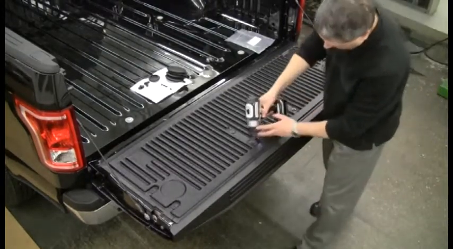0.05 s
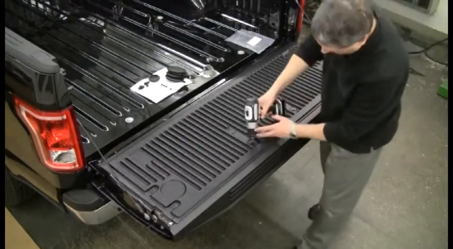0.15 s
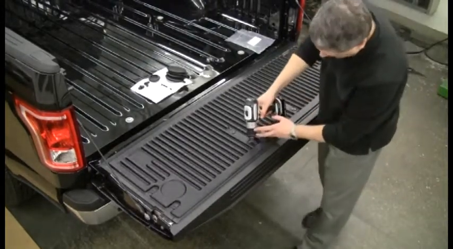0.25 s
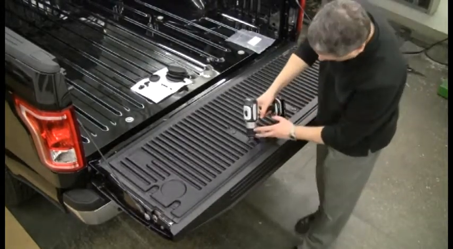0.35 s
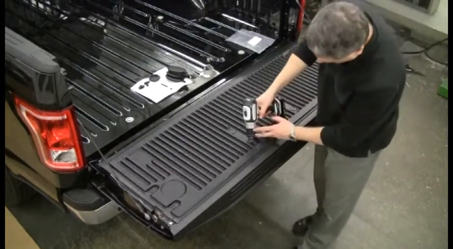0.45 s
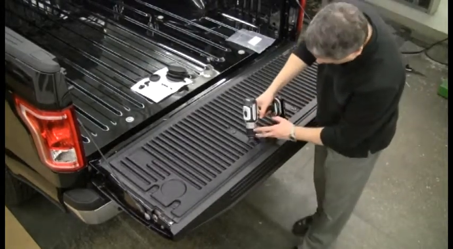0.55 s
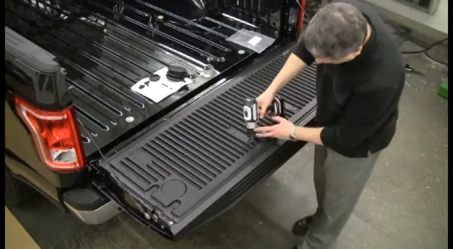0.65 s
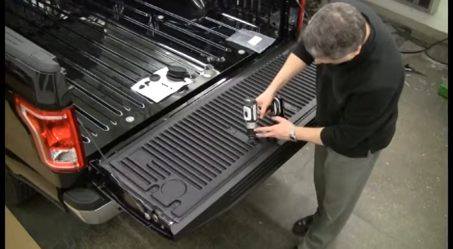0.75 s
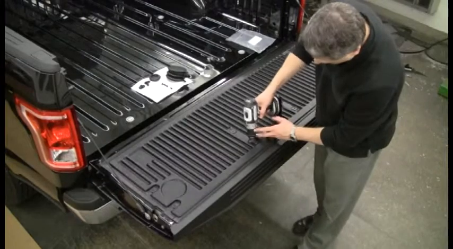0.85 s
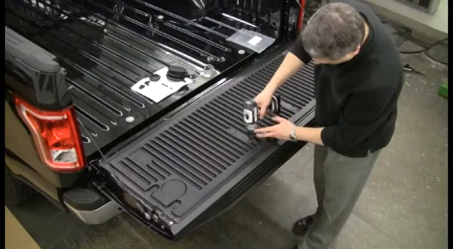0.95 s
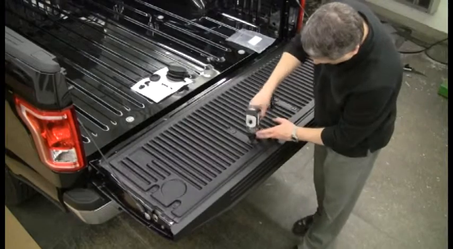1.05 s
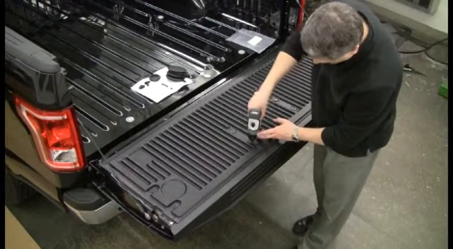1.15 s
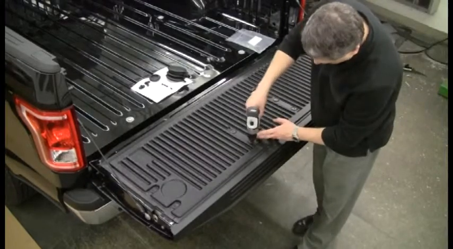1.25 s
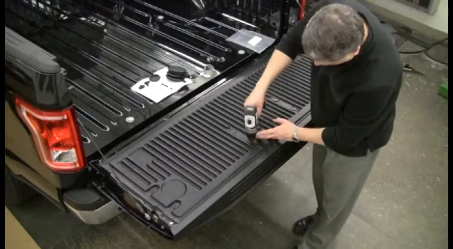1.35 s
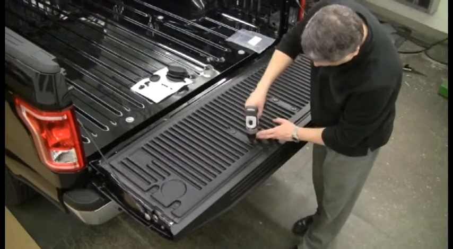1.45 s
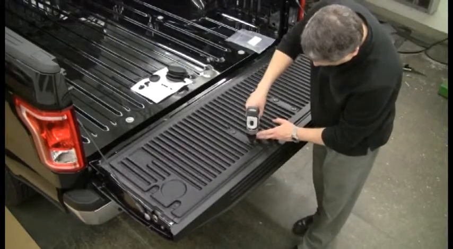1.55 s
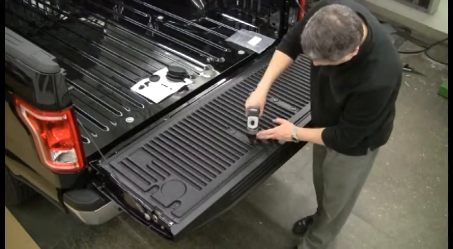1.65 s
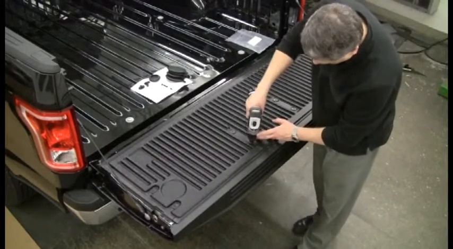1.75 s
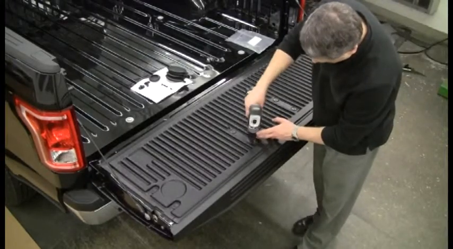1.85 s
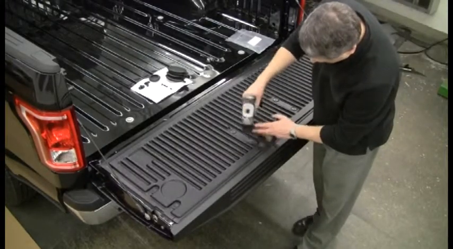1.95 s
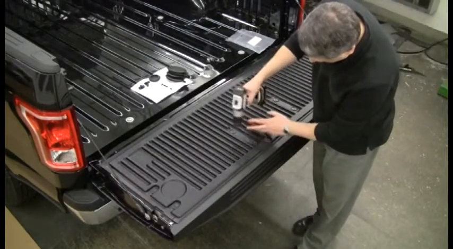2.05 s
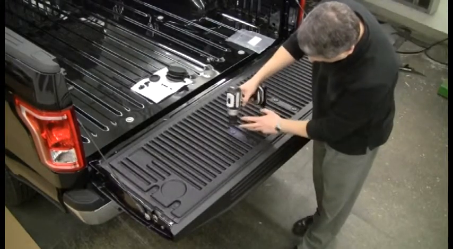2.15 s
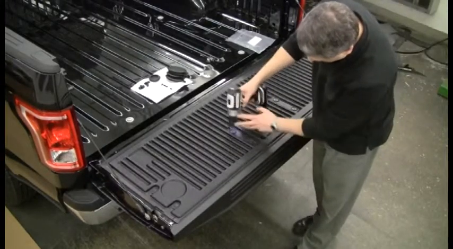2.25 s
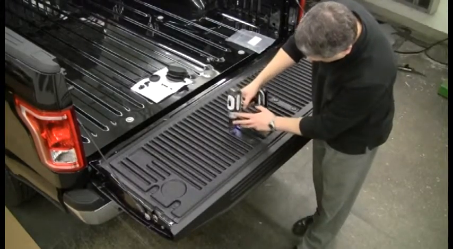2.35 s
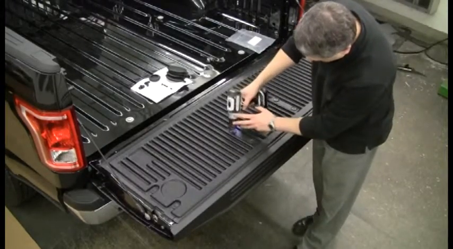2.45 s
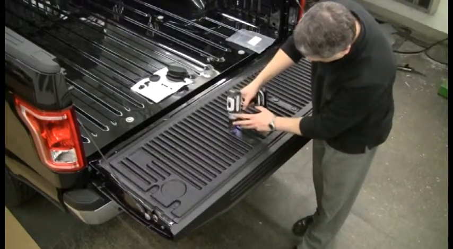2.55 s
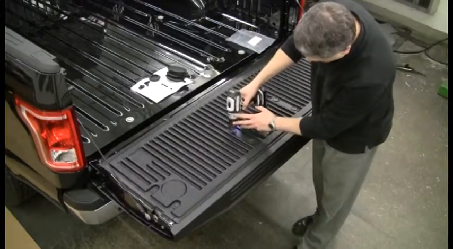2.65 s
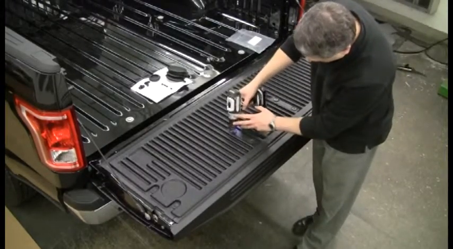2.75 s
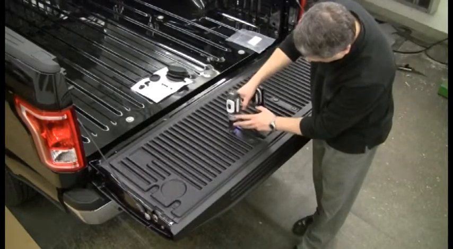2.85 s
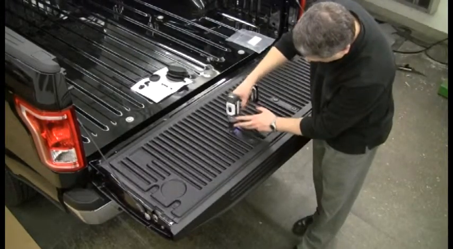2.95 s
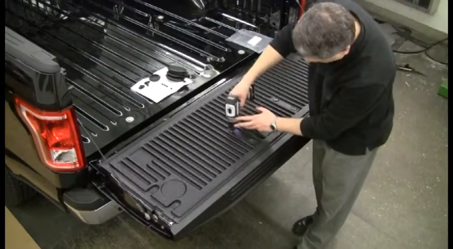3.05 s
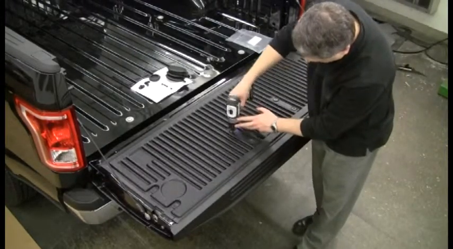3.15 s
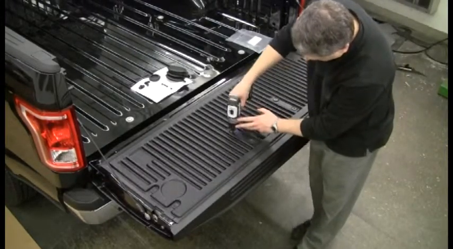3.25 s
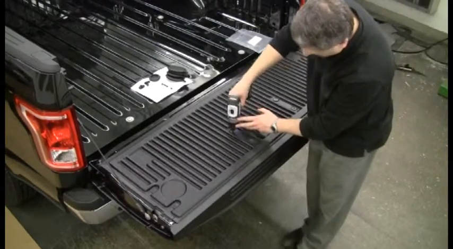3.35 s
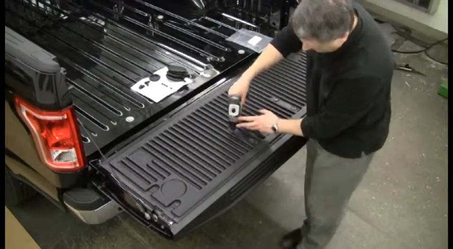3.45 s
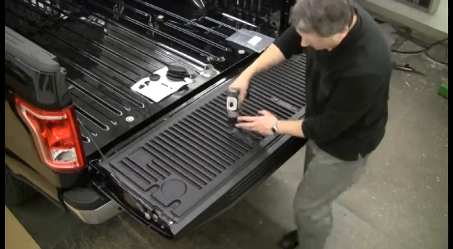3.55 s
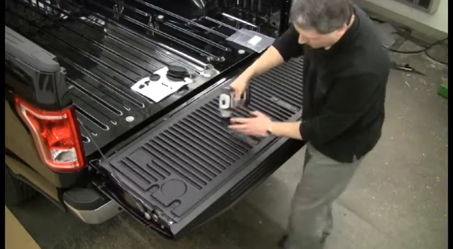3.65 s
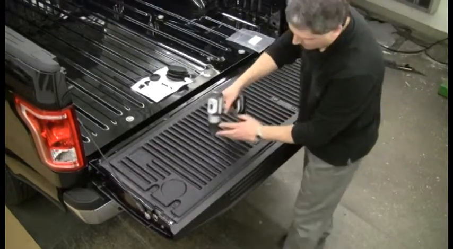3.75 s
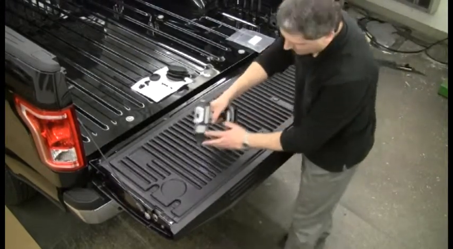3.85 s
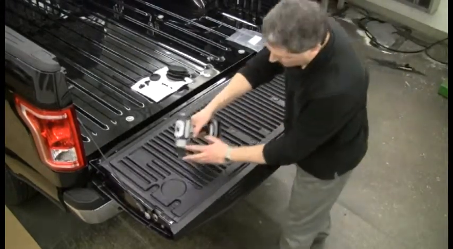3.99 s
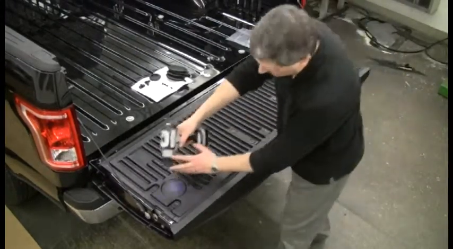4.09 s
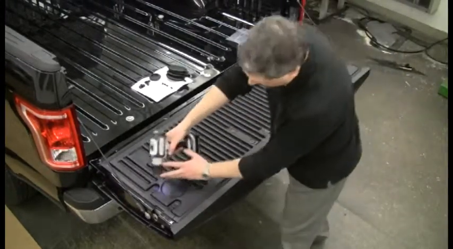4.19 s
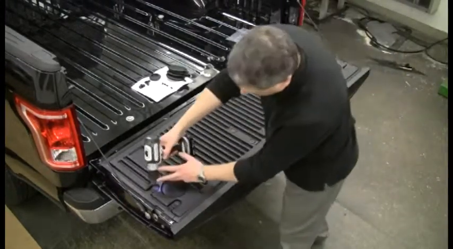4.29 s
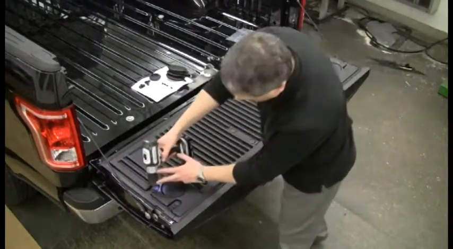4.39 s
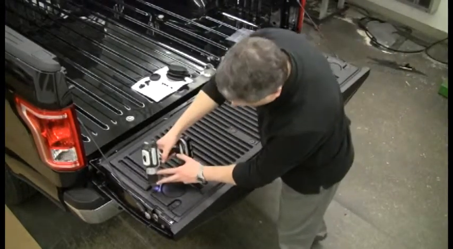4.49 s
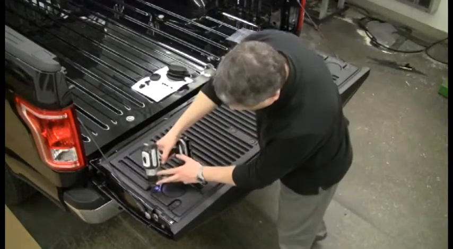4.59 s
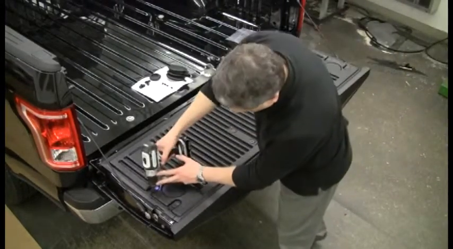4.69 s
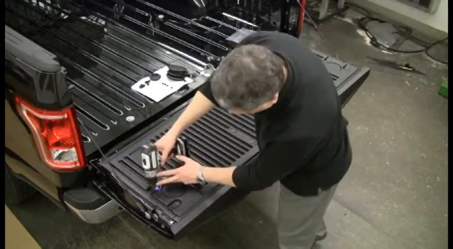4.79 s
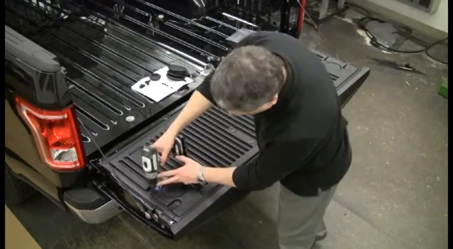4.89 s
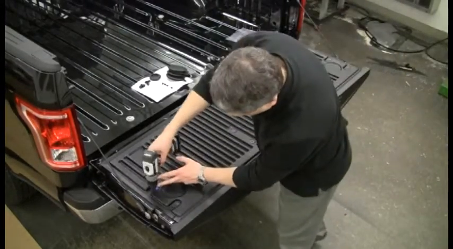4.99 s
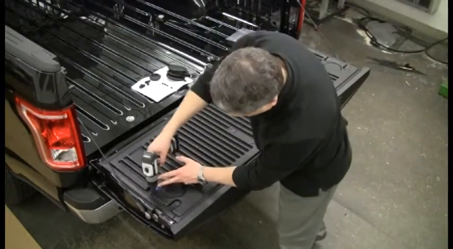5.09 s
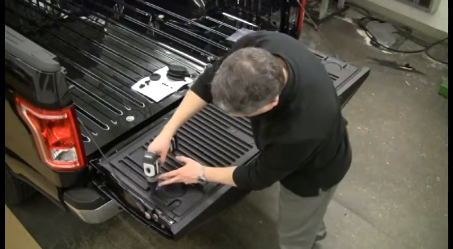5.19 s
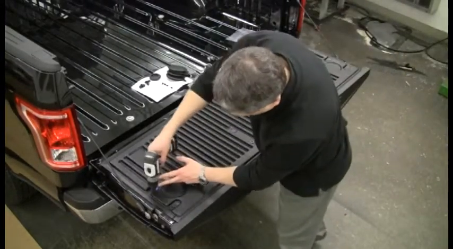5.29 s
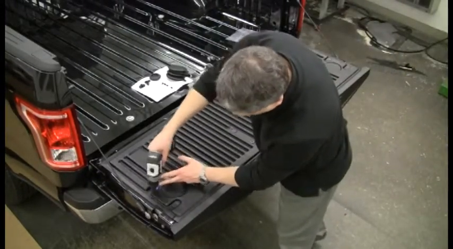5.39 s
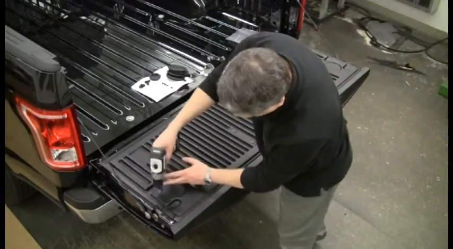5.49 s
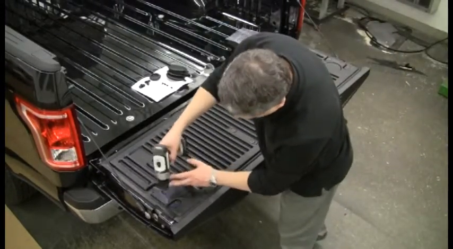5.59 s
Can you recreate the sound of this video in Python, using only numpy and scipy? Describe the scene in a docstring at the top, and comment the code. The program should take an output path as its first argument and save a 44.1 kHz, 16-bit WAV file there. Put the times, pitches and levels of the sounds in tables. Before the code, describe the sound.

Loose plastic panel knocks and a faint shoe scuff come first, then a loud hollow clack. A cordless driver zips briefly, chatters on its clutch and stalls; after more knocks it does so again, and once more near the end. Low rumble continues throughout. Moderately close microphone in a concrete garage, with bright, lively reverberation.

```python
"""Cordless driver and plastic panel

A cordless driver sets three screws into a ribbed plastic panel in a concrete workshop, over a low rumble.
Each burst: a trigger click, gears whining up to speed, then the clutch ratcheting and a rough stop.
Whir, scuffs, knocks and clicks are shaped noise; whine and ratchet are stacks of sine tones plus noise.
The panel knocks under the bit and jolts as the motor starts; a shoe scuffs the floor; the room adds an echo."""
import sys
import numpy as np
from scipy import signal
from scipy.fft import rfft, irfft
from scipy.io import wavfile
from scipy.ndimage import uniform_filter1d, map_coordinates

SR = 44100
rng = np.random.default_rng(int(sys.argv[2]) if len(sys.argv) > 2 else 0)


def transcribe(u):
    """Save the signal u as a 16-bit wav file named by the first command-line argument.

    u: samples, shape (n,) or (channels, n), limited to [-1, 1]; the rate is SR.
    q: integer samples, one column per channel.
    """
    v = np.clip(np.atleast_2d(u).T, -1, 1)
    q = np.round(v * 32767).astype(np.int16)
    wavfile.write(sys.argv[1], SR, q)


def gain_from_decibels(decibels):
    """Convert decibel values to linear amplitude factors."""
    exponent = np.asarray(decibels, float) / 20
    return 10 ** exponent


N = 248282  # length in samples


def evened(x):
    """Scales a sound to an average (rms) strength of 1."""
    return x / np.sqrt(np.mean(x ** 2) + 1e-20)


def read(points, hz):
    """Reads a curve between its points, on a log-frequency axis as the ear hears pitch."""
    f, value = np.transpose(points)
    return np.interp(np.log(hz + 1), np.log(f + 1), value)


def colour(x, points):
    """Makes each pitch region louder or softer, following a curve in dB."""
    size = x.shape[-1]
    gain = gain_from_decibels(read(points, np.fft.rfftfreq(size, 1 / SR)))
    return irfft(rfft(x) * gain, size)


def ring(x, peaks, between_db):
    """Lets x set off resonances, with a flat share of x between them, then evens the result."""
    hz = np.fft.rfftfreq(len(x), 1 / SR)
    modes = sum(gain_from_decibels(db) / (1 + 2j * (hz - f) / width) for f, width, db in peaks)
    return evened(irfft(rfft(x) * (gain_from_decibels(between_db) + modes), len(x)))


def add(mix, s, sound):
    """Mixes a sound in at time s, as sounds in air simply add up."""
    part = mix[round(s * SR):][:len(sound)]
    part += sound[:len(part)]


def unroll(rows):
    """Joins timed rows by straight lines: start time, and every other column at sample rate."""
    s, *columns = np.transpose(rows)
    t = np.arange(s[0], s[-1], 1 / SR)
    return s[0], [np.interp(t, s, c) for c in columns]


def hiss(rows, spectrum, peaks, between_db, grain_db):
    """Rubbing and rushing: grainy coloured noise through resonances, on a level curve."""
    s, (level_db,) = unroll(rows)
    white, grain = rng.standard_normal((2, len(level_db)))
    grain = evened(uniform_filter1d(grain, size=40))
    sound = ring(colour(white * gain_from_decibels(grain_db * grain), spectrum), peaks, between_db)
    return s, sound * gain_from_decibels(level_db) * signal.windows.tukey(len(sound), .06)


# Colour of the background air: f/Hz, level/dB (only the shape counts)
AIR_COLOUR = [(15, -58), (25, -17.5), (114, -0.5), (770, -13.5), (1080, -18), (1730, -23), (2030, -19),
              (2630, -25.5), (4000, -32.5), (9010, -41), (10500, -40.5), (11700, -42.5), (13000, -58)]
# Gain of its side signal: f/Hz, level/dB
AIR_SIDE = [(60, -30), (380, -2), (2380, -3.5), (15000, 0.5)]


def air():
    """Ventilation rumble and distant hum of the shop as noise, slowly swelling: mid and side."""
    swell = evened(uniform_filter1d(rng.standard_normal(N), size=6000))
    noise = evened(colour(rng.standard_normal((2, N)), AIR_COLOUR))
    mid, side = gain_from_decibels(-65 + 1.14 * swell) * noise
    return mid, colour(side, AIR_SIDE)


# Resonances of the plastic panel: f/Hz, width/Hz, level/dB
PANEL_MODES = [(196, 83, 5), (278, 15.3, 4.5), (459, 28, -8), (556, 41, -1.5), (740, 170, -5.5),
               (975, 83, -2), (1470, 440, -2.5)]
# Colour of the blow that sets them off: f/Hz, level/dB (only the shape counts)
BLOW_COLOUR = [(120, -35), (250, -3.5), (700, -5.5), (1500, -10), (3000, -10), (8000, -43)]
# Colour of the sharp crack: f/Hz, level/dB (only the shape counts)
CRACK_SHAPE = [(1000, -20), (2500, 5), (4000, 9.5), (6500, -13), (11000, -7.5), (15000, -55)]


def knock(level_db, crack_db, centre_hz, ring_t60):
    """The loose panel chatters in its modes, strongest near the centre pitch of the blow; plus crack and thud."""
    t = np.arange(SR // 2) / SR
    white = rng.standard_normal((3, len(t)))
    body = ring(colour(white[0], BLOW_COLOUR), PANEL_MODES, between_db=-10)
    body = gain_from_decibels(-6) * colour(body, [(centre_hz / 3, -5), (centre_hz, 0), (centre_hz * 3, -12)])
    body *= gain_from_decibels(-60 * t / ring_t60) * np.minimum(t / 0.00029, 1)
    crack_t60, thud_t60 = .018, .5  # seconds to fade by 60 dB
    crack = evened(colour(white[1], CRACK_SHAPE)) * gain_from_decibels(crack_db - 60 * t / crack_t60)
    low_noise = evened(colour(white[2], [(45, -2), (90, 10.5), (180, 20.5), (350, -26)]))
    thud = low_noise * gain_from_decibels(-22 - 60 * t / thud_t60)
    thud *= 1 - np.exp(-t / 0.0084)  # soft start
    return gain_from_decibels(level_db) * (body + thud + crack)


# Knocks on the panel: blows of the bit, and the jolts as the motor starts at 3.206 and 5.181 s:
# t/s, level/dB, crack level/dB above that, centre of the ring f/Hz, ring t60/s
PANEL_KNOCKS = [(0.263, -37, -20.5, 580, 0.33), (0.482, -37.5, -34, 567, 0.21),
                (0.72, -33.5, -22, 583, 0.25), (0.854, -33, -31, 540, 0.26), (1.091, -51.5, -41, 296, 0.42),
                (1.309, -21, -14, 515, 0.27), (2.285, -45, -45, 400, 0.32), (2.55, -31, -21.5, 473, 0.4),
                (2.661, -47.5, -35, 560, 0.14), (2.969, -39, -26, 601, 0.19), (3.206, -31.5, -7, 606, 0.36),
                (4.655, -30, -12.5, 710, 0.39), (4.69, -36, -34, 447, 0.26),
                (4.819, -36.5, -31.5, 404, 0.21), (5.181, -34, -2.5, 570, 0.73)]


def panel_knocks(mix):
    """Blows of the bit and motor-start jolts knock the panel, each with its own strength and pitch."""
    for s, *blow in PANEL_KNOCKS:
        add(mix, s, knock(*blow))


# Echo of the workshop: f/Hz, t60/s
ECHO_T60 = [(100, 0.39), (300, 0.8), (800, 0.7), (2000, 1.1), (5000, 1.17), (9000, 0.62), (13000, 0.4)]


def shop(x):
    """Two tails of sparse random taps, each band dying at its own speed; a random wandering delay blurs steady tones."""
    taps = np.zeros((2, 60000))
    # one tap of random sign somewhere in every 20 samples
    at = np.arange(300, 59980, 20) + rng.integers(0, 20, (2, 2984))
    np.put_along_axis(taps, at, rng.choice([-1., 1.], at.shape), 1)
    hz, t, z = signal.stft(taps, SR, nperseg=256)
    fade = gain_from_decibels(-60 * t / read(ECHO_T60, hz)[:, None])
    tail = signal.istft(z * fade, SR, nperseg=256)[1]
    wander = uniform_filter1d(uniform_filter1d(rng.standard_normal(N), size=450), size=450)
    # typically 12 samples early or late
    blurred = map_coordinates(x, [np.arange(N) + 12 * evened(wander)], order=3)
    return signal.fftconvolve(blurred[None], tail / np.linalg.norm(tail[0]), axes=1)[:, :N]


# Shoe scuffs: start t/s, rise t/s, fall t/s, loudest level/dB
SHOE_SCUFFS = [(.385, 0.074, .12, -53), (3.869, .016, 0.067, -53)]
# Colour of the rubbing: f/Hz, level/dB (only the shape counts)
RUB_COLOUR = [(1000, -14), (2000, -11.5), (4500, -12.5), (12000, -21), (15000, -39)]
# Resonances of the sole: f/Hz, width/Hz, level/dB
SOLE_MODES = [(2510, 330, -7), (3540, 440, -7)]


def scuffs(mix):
    """A sole rubs the floor: noise that swells and falls."""
    for s, rise, fall, db in SHOE_SCUFFS:
        edge_db = db - 13.5
        rows = [(s, edge_db), (s + rise, db), (s + rise + fall, edge_db)]
        add(mix, *hiss(rows, RUB_COLOUR, SOLE_MODES, between_db=-8.5, grain_db=0))


def click(peak_db, hz, t60):
    """A short snap of noise, a broad band reaching up to about the given pitch."""
    t = np.arange(3000) / SR
    burst = rng.standard_normal(len(t)) * gain_from_decibels(-60 * t / t60)
    burst[0] = 4  # the first contact is a strong kick
    band = signal.butter(2, [hz / 4.74, hz * 1.1], "bandpass", fs=SR, output="sos")
    snap = signal.sosfilt(band, burst)
    return gain_from_decibels(peak_db) * snap / abs(snap).max()


# Sharp clicks of the bit: t/s, peak level/dB, upper edge f/Hz, t60/s
BIT_CLICKS = [(0.559, -47, 844, .04), (0.852, -48, 3000, 0.019), (1.303, -39.5, 800, 0.048),
              (1.31, -32, 2330, 0.032), (4.05, -39.5, 1220, 0.031), (4.272, -48, 6460, 0.015),
              (4.294, -42.5, 1390, 0.038), (4.657, -31.5, 3230, 0.013)]


def bit_clicks(mix):
    """The bit makes sharp clicks, each a short snap of noise."""
    for s, *snap in BIT_CLICKS:
        add(mix, s, click(*snap))


# Colour of the motor's whir: f/Hz, level/dB (only the shape counts)
MOTOR_COLOUR = [(150, -57), (400, -11), (1500, -10.5), (2500, -11.5), (4000, -9.5), (6200, -7), (11000, -6),
                (13000, -11.5), (15500, -11)]
# Resonances of the tool's shell: f/Hz, width/Hz, level/dB
SHELL_MODES = [(3490, 1600, 4), (4770, 1900, -10), (7940, 1800, -6), (10250, 1100, -8), (11400, 600, -7.5)]


def whir(trigger, lets_go, stalls, db):
    """Motor noise swells with speed, drops when the clutch takes the load, swells again and ends after the stall."""
    rows = [(trigger, db - 18), (trigger + 0.026, db - 6), (trigger + 0.058, db - 3),
            (lets_go, db), (lets_go + 0.035, db - 9),
            (stalls, db - 4.5), (stalls + .04, db - 5)]  # t/s, level/dB
    return hiss(rows, MOTOR_COLOUR, SHELL_MODES, between_db=-7, grain_db=1.6)


def run_up(trigger, lets_go, db, spin_s):
    """The shaft leaps to a share of top speed, then eases up; the whine grows with time and speed: t/s, f/Hz, level/dB."""
    lag_s, top_hz, start_share = .012, 286.9, .45
    t = np.linspace(0, lets_go - trigger - lag_s, num=32)
    hz = top_hz * (1 - (1 - start_share) * np.exp(-(t / spin_s) ** 2))
    early_db = -4.5 * (1 - t / t[-1])  # quieter at first
    slow_db = -30 * (1 - hz / top_hz)  # and quieter at low speed
    return np.transpose([trigger + lag_s + t, hz, db + early_db + slow_db])


# Whine tones as multiples of shaft speed: unbalance, commutator and gear mesh
SHAFT_MULTIPLES = [1, 2, 9, 9.7, 16.87, 18.6, 20, 25.3]


def whine(rows, orders_db):
    """Shaft multiples rising with the motor, each wavering a little, and a hiss beating once a turn."""
    s, (shaft_hz, level_db) = unroll(rows)
    turns = np.cumsum(shaft_hz) / SR
    waver = uniform_filter1d(rng.standard_normal((len(orders_db), len(turns))), size=500)
    # pitch and strength both flutter as the gears take load
    tones = sum(gain_from_decibels(db + 60 * w[::-1]) * np.sin(2 * np.pi * k * turns + 9.3 * w)
                for k, db, w in zip(SHAFT_MULTIPLES, orders_db, waver))
    beat = np.exp(-(turns % 1) / 0.42)
    brushes = colour(rng.standard_normal(len(turns)) * beat, MOTOR_COLOUR)
    brushes = ring(brushes, SHELL_MODES, between_db=-4)
    sound = np.sqrt(2) * tones + gain_from_decibels(-9) * brushes
    return s, sound * gain_from_decibels(level_db) * signal.windows.tukey(len(turns), .1)


def slipping(lets_go, stalls, db, rate_hz, first_db, stop_db, stop_s, fade_db):
    """The ratchet settles, runs steady, then slows and roughens at the stall: t/s, level/dB, f/Hz, roughness 0-1."""
    steady_rough, stop_rough = 0.013, 0.84
    sag_hz, stop_hz = rate_hz * .92, rate_hz * .8
    stop, end_db = stalls + stop_s, db + stop_db
    return [(lets_go, db + first_db, rate_hz * 0.98, 0.2),
            (lets_go + .035, db, rate_hz, steady_rough),
            (stalls - .01, db - 0.7, rate_hz, steady_rough),
            (stalls + 0.02526, db + stop_db / 2, sag_hz, stop_rough),
            (stop, end_db, stop_hz, stop_rough),
            (stop + .055, end_db + fade_db, stop_hz, stop_rough)]


# Colour of the rough rattle: f/Hz, level/dB (only the shape counts)
RATTLE_COLOUR = [(88, -42), (150, -15), (352, -1.5), (748, 3.5), (1750, -6), (2540, -8.5), (4000, -12.5),
                 (5200, -27), (8800, -120)]


def clutch(rows, orders_db):
    """Each slip kicks the panel: clean multiples while steady, rattle as it stalls, a hiss tick per slip."""
    s, (level_db, rate_hz, rough) = unroll(rows)
    slips = np.cumsum(rate_hz) / SR
    # each multiple drifts in strength as the screw seats; each has its own fixed phase
    drift = evened(uniform_filter1d(rng.standard_normal((len(orders_db), len(slips))), size=2000))
    steady = sum(gain_from_decibels(db + 2.76 * d) * np.cos(2 * np.pi * k * slips - 0.0414 * k ** 2)
                 for k, (db, d) in enumerate(zip(orders_db, drift), start=1))
    fade = np.exp(-(slips % 1) / 0.46)
    size = gain_from_decibels(1.03 * rng.standard_normal(64))[slips.astype(int)]  # no two slips alike
    white = rng.standard_normal((2, len(slips)))
    rattle = evened(colour(white[0] * (1 + fade) * size, RATTLE_COLOUR))
    ticks = colour(white[1] * fade ** 3 * size ** 2, MOTOR_COLOUR)
    ticks = ring(ticks, SHELL_MODES, between_db=3)
    clean = evened(steady) + gain_from_decibels(-8.5) * ticks
    sound = np.sqrt(1 - rough) * clean + np.sqrt(rough) * rattle
    return s, sound * gain_from_decibels(level_db) * signal.windows.tukey(len(slips), .03)


# One row a screw: trigger t/s, clutch lets go t/s, bit stalls t/s, whir level/dB, whine level/dB, spin-up t/s
SCREWS = [(1.564, 1.724, 1.845, -36.5, -47.5, .042), (3.192, 3.286, 3.41, -37.5, -49.5, 0.028),
          (5.161, 5.3, 5.408, -37.5, -45, .04)]
# One row a screw, level/dB of each whine tone
WHINE_LEVELS = [(-2, -6, -4, 1.5, -4, -11, 2, -1.5), (-16, -11.5, 4, -16.5, 1.5, 2.5, -5, -1),
                (-16, -8, 1.8, -10, -12, -5, -9, -4.5)]
# One row a screw: clutch level/dB, ratchet rate f/Hz, first slips level/dB above that,
# rough stop level/dB above that, stop length t/s, final fade level/dB
RATCHETS = [(-34, 134.6, 0.6, 2, .04, -26), (-35, 136, 2.2, 2.5, .04, -9.5),
            (-32.5, 130, -6, -3.5, .06, -9)]
# One row a screw, how the panel answers: level/dB of multiples 1 to 16 of the ratchet rate
PANEL_ANSWERS = [ (-15.5, 6.5, 5, -1, -22, -1, -3.5, 1, -57, -1.5, -7.5, 7, -4, -4, -7.5, -13),
                 (-18.5, 4.5, -1.5, -6.5, -26, 2.5, -3.5, -5, -1, 5.5, -23, 1, -10, -6, -6, -25),
                 (-51, -4, 2.5, -1, -17, 0.5, -8.5, -7.5, -35, -19, -10.5, -8, -23, -11, -28, -14), ]


def drive_screws(mix):
    """Each burst: the trigger clicks, the motor spins up, the clutch lets go and slips until the bit stalls."""
    for burst, whine_levels, ratchet, answer in zip(SCREWS, WHINE_LEVELS, RATCHETS, PANEL_ANSWERS):
        trigger, lets_go, stalls, whir_db, whine_db, spin_s = burst
        add(mix, trigger, click(peak_db=-41, hz=5000, t60=0.046))
        add(mix, *whir(trigger, lets_go, stalls, whir_db))
        add(mix, *whine(run_up(trigger, lets_go, whine_db, spin_s), whine_levels))
        # the clutch click follows about half of the first slips' extra level
        click_db = ratchet[0] + 0.51 * ratchet[2] + 13.1
        add(mix, lets_go, click(click_db, hz=2450, t60=0.0085))
        add(mix, *clutch(slipping(lets_go, stalls, *ratchet), answer))


# Gain of the diffuse side signal: f/Hz, level/dB
SIDE_GAIN = [(60, -14), (150, -36.5), (380, -23), (950, -15), (2380, -15), (5980, -9), (15000, -2)]


def scene():
    """All sources near the middle; the side signal is the diffuse part, its gain highest in the treble."""
    near = np.zeros(N)
    panel_knocks(near)
    scuffs(near)
    bit_clicks(near)
    drive_screws(near)
    mid, side = gain_from_decibels(-5.5) * shop(near)
    air_mid, air_side = air()
    bounces = rng.standard_normal(2000) * np.exp(-np.arange(2000) / 600)  # nearby surfaces
    bounced = np.convolve(near, bounces / np.linalg.norm(bounces))[:N]
    side = colour(side + bounced, SIDE_GAIN) + air_side
    mid += near + air_mid
    return np.array([mid + side, mid - side])


# Overall tone of the sound: f/Hz, level/dB
OVERALL_TONE = [(30, -10), (60, 3), (13000, -2), (15000, -10), (15600, -23), (15900, -69)]


def overall_tone(x):
    """Trims the deepest lows and the highs, with a steep cut near 15.7 kHz."""
    return colour(x, OVERALL_TONE)


def low_pass(x):
    """Removes everything above the highest recorded frequency."""
    return signal.sosfilt(signal.butter(12, 15740, fs=SR, output="sos"), x)


def record(dry):
    """Gives the scene its overall tone and returns the finished sound."""
    mix = overall_tone(dry)
    return low_pass(mix)


dry = scene()
out = record(dry)
transcribe(out)
```